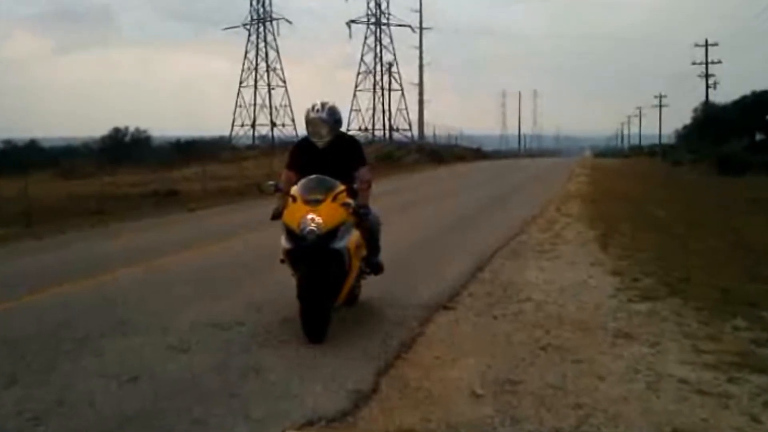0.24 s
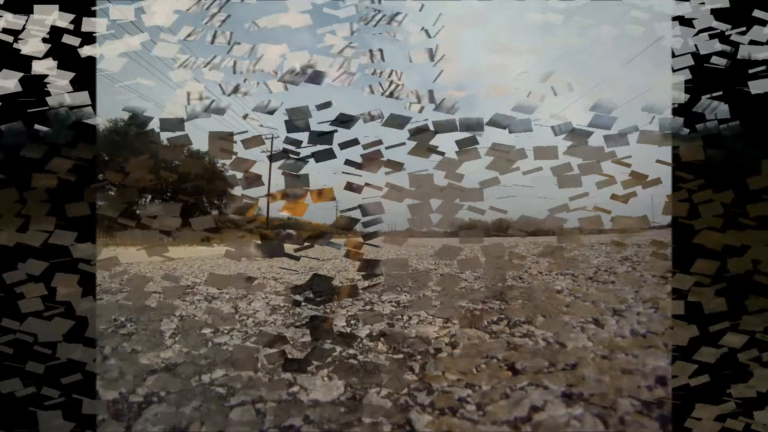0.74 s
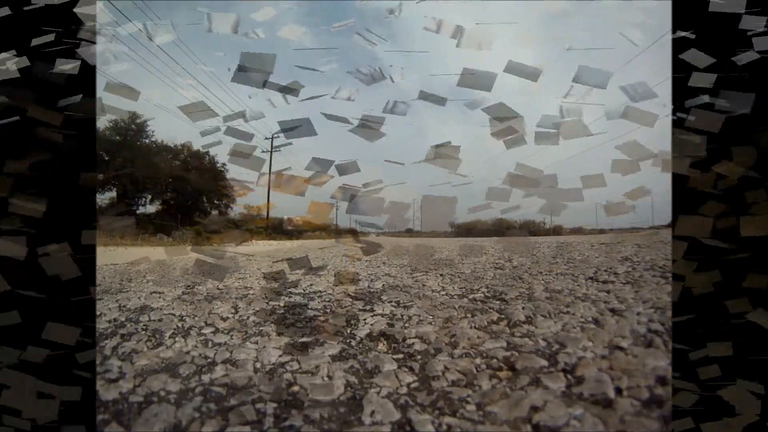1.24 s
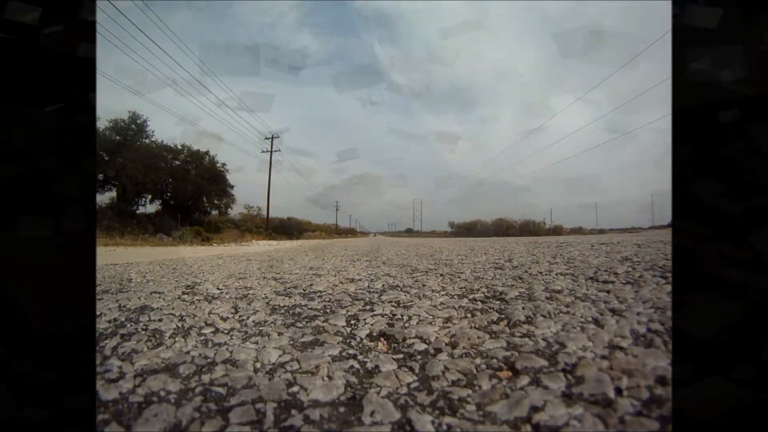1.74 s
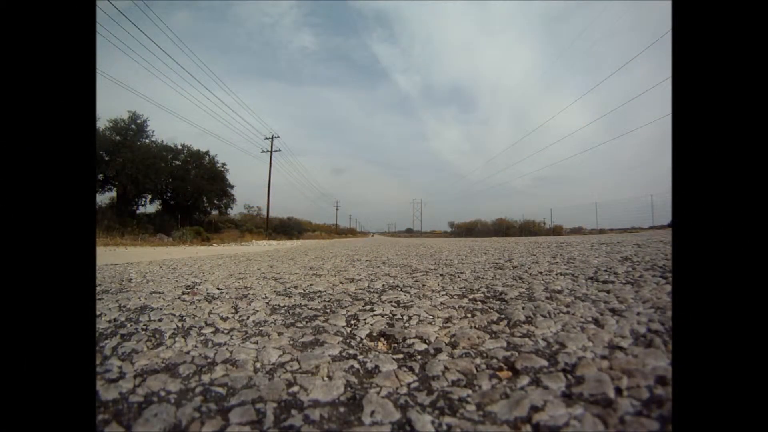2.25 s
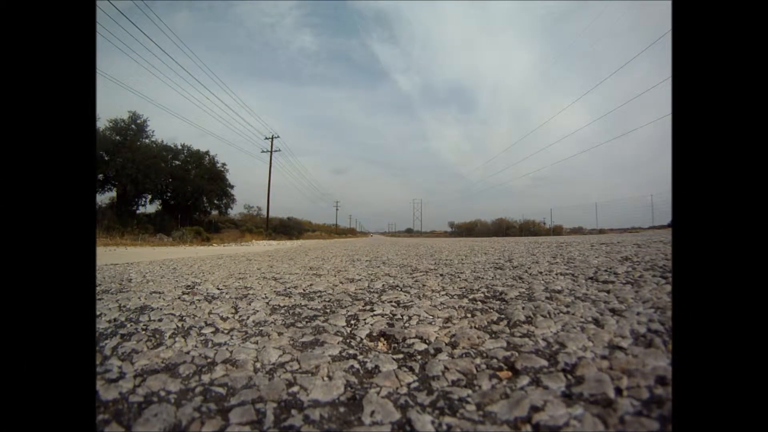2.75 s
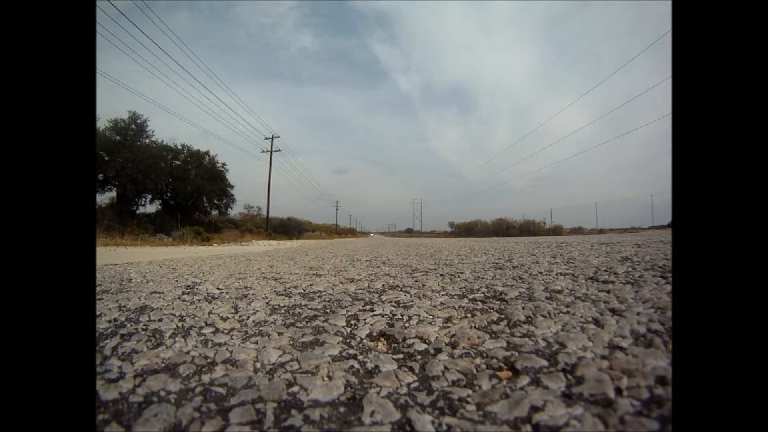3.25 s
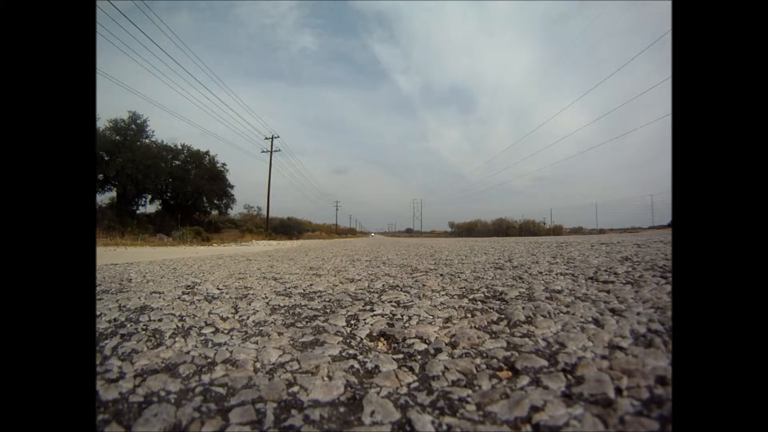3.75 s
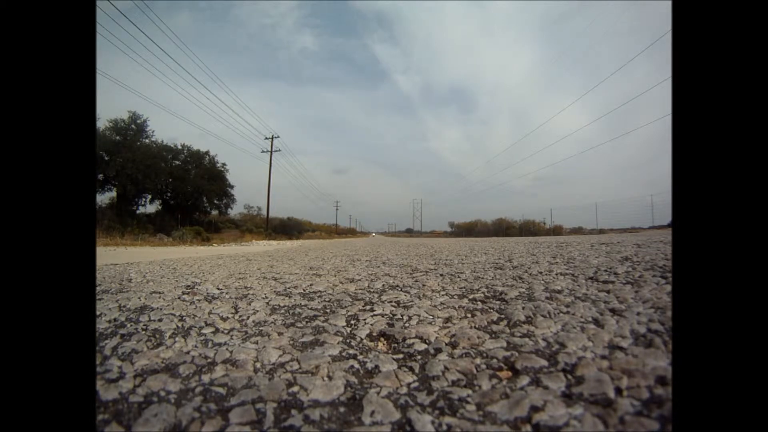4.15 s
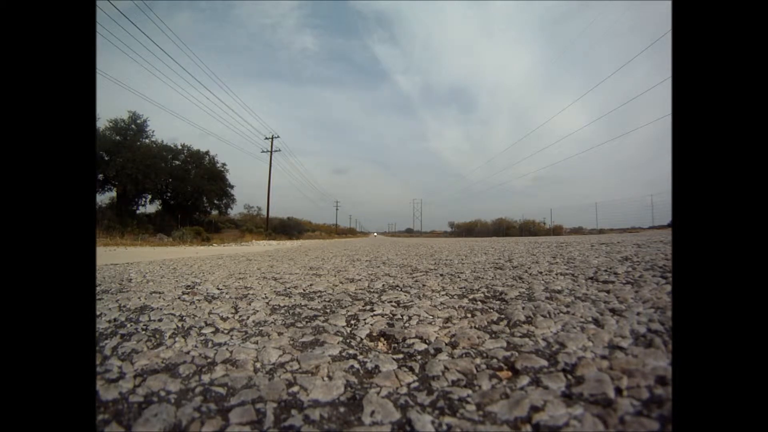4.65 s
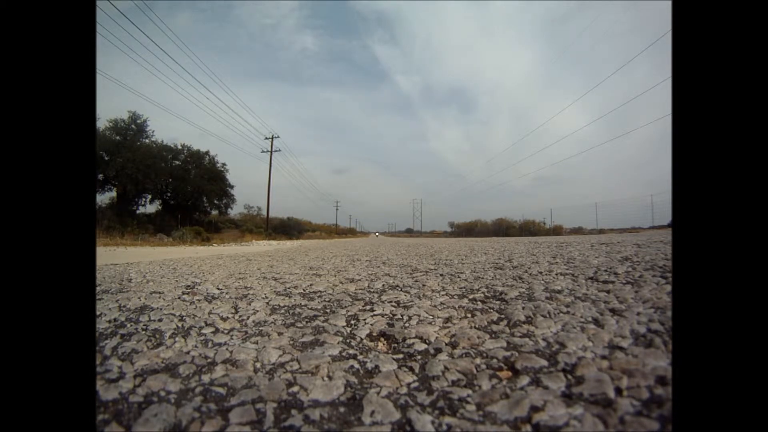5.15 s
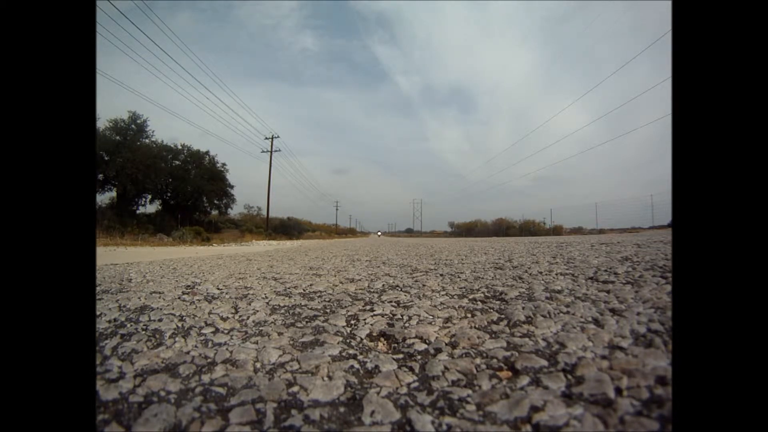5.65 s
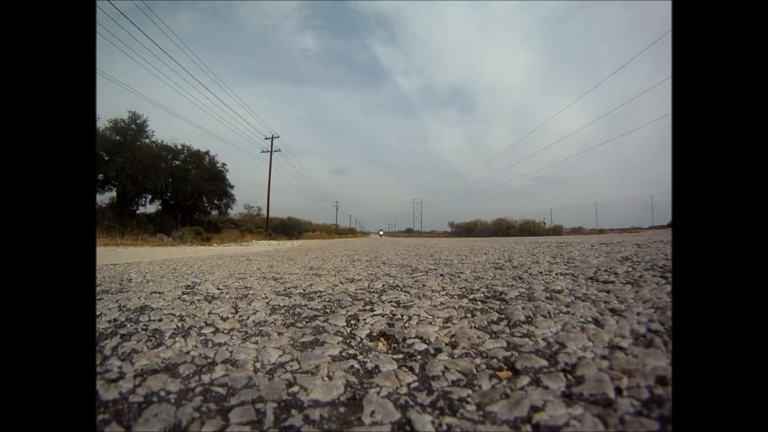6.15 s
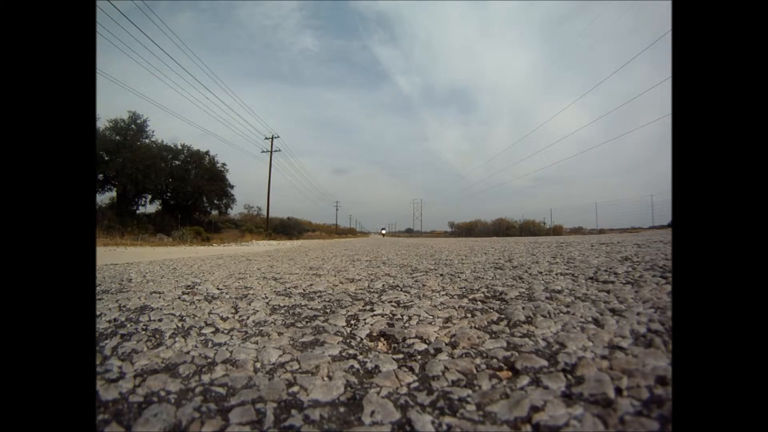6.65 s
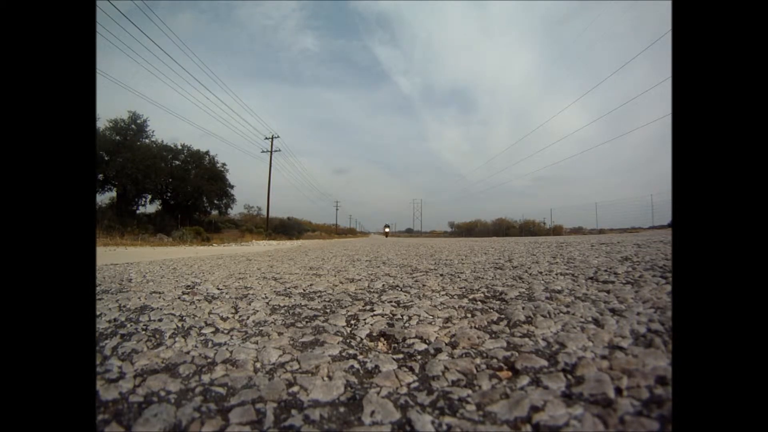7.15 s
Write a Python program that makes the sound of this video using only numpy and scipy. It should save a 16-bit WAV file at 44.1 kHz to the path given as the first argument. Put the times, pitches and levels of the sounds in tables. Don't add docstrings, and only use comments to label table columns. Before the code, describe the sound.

A motorcycle idles low and lumpy, pulls away on an open road, revs to a hard high drone, then stumbles through two quick late shifts.

```python
import sys
import numpy as np
from scipy import signal
from scipy.fft import rfft, irfft
from scipy.io import wavfile
from scipy.ndimage import uniform_filter1d

SR = 44100
rng = np.random.default_rng(int(sys.argv[2]) if len(sys.argv) > 2 else 0)


def put_to_file(sound):
    columns = np.atleast_2d(sound).T
    safe = np.clip(columns, -1, 1)
    whole_steps = np.round(safe * 32767)
    wavfile.write(sys.argv[1], SR, whole_steps.astype(np.int16))


def field_ratio(decibels):
    return 10 ** (np.asarray(decibels, dtype=float) / 20)


N = 326781
LONG = N + SR // 10

# (time [s], crank slip [cycles], change of exhaust level [dB])
STUMBLES = [
    (6.897, .45, -3),
    (6.907, 0, 2.5),
    (6.917, 0, -9),
    (7.016, .14, -3),
    (7.024, 0, 1),
    (7.032, -.12, -3),
    (7.303, -.2, -10),
]


def engine(t, hz, thump_db, drone_db, bark_db, gas_db, crank_db):
    # (frequency [Hz], level [dB])
    cold_silencer = [(5, -70), (35, -20), (50, -15), (72, -10.5), (108, -12), (143, 0), (165, -4),
                     (187, -7.5), (230, -19), (262, -27), (330, -40), (450, -64), (6000, -120)]
    # (frequency [Hz], level [dB])
    hot_silencer = [(20, -52.5), (60, -4), (110, -1), (150, 6), (205, 7.5), (255, -1.5), (320, -49),
                    (450, -54), (6000, -110)]
    # (frequency [Hz], level [dB])
    header = [(20, -59.5), (200, -25), (270, 1), (320, -3.5), (430, -3.5), (500, -2.5), (600, -37),
              (6000, -98.5)]
    # (frequency [Hz], level [dB])
    pipe = [(20, -75), (380, -32), (470, -2), (530, 3.5), (630, -4), (720, -10), (855, -20.5), (960, -32),
            (1100, -37.5), (1500, -47), (2500, -58), (6000, -94.5)]
    # (frequency [Hz], level [dB])
    manifold = [(20, -48.5), (100, -11.5), (300, 0.5), (420, -1), (530, 2.5), (620, -9.5), (710, -5),
                (820, -10), (1400, -44), (2000, -28), (6000, -62)]
    # (frequency [Hz], level [dB])
    jet = [(200, -37.5), (700, 1.5), (1000, -1.5), (1300, -0.5), (1600, -7), (2200, -4.5), (2600, -12.5),
           (2950, -0.5), (3300, -7), (3600, -16.5), (6000, -43.5)]
    # (start firing rate [Hz], end firing rate [Hz])
    warm_hz = (87.6, 140)

    pulses, alternate, phase = firings(t, hz)
    puffs = np.exp(-phase / .5) * noise() * np.sqrt(hz / SR)

    warm = np.clip((hz - warm_hz[0]) / (warm_hz[1] - warm_hz[0]), 0, 1)
    push = pulses + field_ratio(-17.5) * puffs
    cold_thump = colour(push, cold_silencer, ring=-0.076)
    hot_thump = colour(push, hot_silencer, ring=-0.11)
    thump = (1 - warm) * cold_thump + warm * hot_thump
    thump = thump + idle_ring(hz, thump)

    drone = roadside(colour(pulses + field_ratio(-2.0) * puffs, header, ring=0.4))
    bark = roadside(colour(pulses + field_ratio(-6.5) * puffs, pipe, ring=0.23))
    crank = roadside(colour(alternate, manifold))
    uneven_puffs = puffs * field_ratio(0.45 * walk(25))
    gas = roadside(colour(field_ratio(-13.5) * pulses + uneven_puffs, jet))

    exhaust = ride(thump, thump_db) + ride(drone, drone_db) + ride(bark, bark_db)
    exhaust = exhaust * misfires(t)
    mechanical = ride(crank, bark_db + crank_db) + ride(gas, gas_db)
    return exhaust + mechanical + howls(hz, pulses + field_ratio(5.0) * puffs)


def throttle(t):
    # (time [s], firing rate [Hz], loudness [dB], brightening of the nearing exhaust [dB])
    journey = [(.42, 32.93, -38, 0), (.9, 36, -35, 0.5), (1.82, 37.08, -33.5, -1.5), (2.35, 47, -30, 2),
               (2.701, 58.44, -30, 2.5), (2.8, 65.1, -22.5, -1), (3.38, 92.7, -19.5, 0.5),
               (3.63, 107.4, -15.5, -2.5), (4.12, 143.4, -16.5, -1), (4.68, 184.6, -13.5, -1),
               (4.95, 201.4, -13, 0.5), (5.17, 205.4, -12.5, -0.5), (5.4, 208.5, -12.5, .3),
               (6.0, 214.3, -12.5, 2), (6.35, 213.9, -14.5, 9.5), (6.9, 212.6, -12, 13),
               (7.082, 204.5, -12.5, 14), (7.41, 197.6, -12.5, 12.5)]
    # (peak time [s], rise [s], fall [s], rate jump [Hz], loudness jump [dB])
    blips = [
        (2.02, .19, .33, 16.5, -1.1),
        (6.991, .09, .085, -13.5, -0.25),
        (7.353, .06, .09, 56, 0.04),
    ]
    # (firing rate [Hz], thump [dB], drone [dB], bark [dB],
    # gas [dB], crank sound against bark [dB])
    voicing = [(36, 0.23, -62, -45, -46.5, -16), (52.9, 1.4, -31.5, -29.5, -41.5, -16),
               (69.5, -0.3, -22, -31.5, -49.5, -19), (96, 0.2, -17, -25, -49.5, -13.5),
               (123.3, -6.5, -18, -20, -48, -12.5), (139, 1.6, -13, -16.5, -46, -12.5),
               (176, -0.75, -20, -14.5, -44, -17.5), (197.6, 0.73, -28.5, -12.5, -46, -19.5),
               (212.4, -0.23, -19.5, -18.5, -44.5, -12.5), (215, 1.1, -13.5, -18.5, -44.5, -11.5)]
    closing = (0.33, 0.22, 1.054)
    # (drone [dB], bark [dB], gas [dB], crank sound [dB])
    shut_db = (-1.5, -14.5, -6.5, 14)
    # (time [s], level [dB])
    pops = [
        (6.903, 2),
        (7.022, 8),
        (7.297, 9),
    ]
    pop_s = 0.0098
    hunt_s, hunt_span_s, hunt_hz, hunt_share = 4.865, .17, 10.5, .014

    times, *columns = np.transpose(journey)
    hz, loud_db, near_db = (np.interp(t, times, c) for c in columns)
    for peak, rise, fall, jump_hz, jump_db in blips:
        slope = np.interp(t, [peak - rise, peak, peak + fall], [0, 1, 0])
        leap = np.sin(np.pi / 2 * slope) ** 1.3
        hz = hz + jump_hz * leap
        loud_db = loud_db + jump_db * leap

    rate, *columns = np.transpose(voicing)
    thump_db, *upper, crank_db = (np.interp(hz, rate, c) for c in columns)
    shut = gate(t, (6.92, 7.3), .02)
    pop_db = sum(db * np.exp(-((t - s) / pop_s) ** 2) for s, db in pops)
    drone_db, bark_db, gas_db = (loud_db + db + share * near_db + cut_db * shut
                                 for db, share, cut_db in zip(upper, closing, shut_db))

    hunt = np.exp(-((t - hunt_s) / hunt_span_s) ** 2) * np.sin(2 * np.pi * hunt_hz * (t - hunt_s))
    hz = hz * (1 + hunt_share * hunt)
    crank_db = crank_db + shut_db[-1] * shut
    return hz, loud_db + thump_db, drone_db + pop_db, bark_db + pop_db, gas_db, crank_db


def firings(t, hz):
    # (firing rate [Hz], speed wander [ratio], size scatter [dB])
    rough = [(38, .036, 1.8), (52, .013, .8), (90, .007, .4), (175, .007, .3), (193, .006, .3),
             (208, .004, .35), (214, .003, .4)]
    cylinders = [1, 0, -1, 0]

    rate, *columns = np.transpose(rough)
    wander, scatter_db = (np.interp(hz, rate, c) for c in columns)
    imbalance_db = .3 + 1.4 * gate(t, (6.25, 6.92), .1)

    turns = np.cumsum(hz * (1 + wander * 1.5 * walk(20))) / SR
    for s, slip, _ in STUMBLES:
        turns = turns + slip * np.clip((t - s) / .012 + .5, 0, 1)

    k = np.arange(1, int(turns[-1]))
    chance = rng.standard_normal((N // 100, 2))[k].T
    jitter = .003 + .35 * np.interp(k, turns, wander)
    at = np.interp(k + jitter * chance[0], turns, t)
    i, part = np.divmod(np.clip(at * SR, 0, LONG - 2), 1)
    i = i.astype(int)
    size_db = np.resize(cylinders, len(k)) * imbalance_db[i] + chance[1] * scatter_db[i]

    def pulse_train(size):
        return np.bincount(i, size * (1 - part), LONG) + np.bincount(i + 1, size * part, LONG)

    pulses = pulse_train(field_ratio(size_db))
    alternate = pulse_train(field_ratio(size_db) * (-1.) ** k)
    return pulses, alternate, turns % 1


def misfires(t):
    return field_ratio(sum(dip_db * np.exp(-((t - s) / .005) ** 2) for s, _, dip_db in STUMBLES))


def idle_ring(hz, thump):
    ring_hz, decay_s, ring_db = 162, 0.027, 2.3
    s = np.arange(SR // 5) / SR
    shell = np.exp(-s / decay_s) * np.cos(2 * np.pi * ring_hz * s)
    ring = signal.oaconvolve(thump, shell)[:LONG]
    return field_ratio(ring_db) * ring * 2 / (decay_s * SR) * np.interp(hz, (39.6, 58.3), [1, 0])


def howls(hz, drive):
    # (firing rate [Hz], rate span [Hz], resonance [Hz], width share [ratio], level [dB])
    singers = [
        (145, 34, 1010, 0.23, -56),
        (170, 9.9, 3000, .07, -61.5),
        (219.4, 2.3, 2400, .07, -60),
    ]
    out = 0
    for rate, span, ring_hz, share, db in singers:
        shape = [(ring_hz / 4, -70), (ring_hz * (1 - share), -14), (ring_hz, 0),
                 (ring_hz * (1 + share), -14), (ring_hz * 2, -60)]
        out = out + ride(colour(drive, shape), db) * np.exp(-((hz - rate) / span) ** 2)
    return out


def roadside(x):
    tail = rng.standard_normal(SR // 10) * np.exp(-np.arange(SR // 10) / (0.043 * SR))
    tail = tail / np.sqrt(np.sum(tail ** 2))
    return x + field_ratio(-11) * signal.oaconvolve(x, tail)[:LONG]


def thuds(t):
    # (time [s], level [dB])
    knocks = [
        (6.44, -33),
        (6.9, -20.5),
        (7.021, -25.5),
    ]
    knock_hz, knock_s = 124, 0.0099
    return sum(field_ratio(db) * np.exp(-((t - s) / knock_s) ** 2) * np.sin(2 * np.pi * knock_hz * (t - s))
               for s, db in knocks)


def wind(t):
    # (time [s], change of level [dB])
    gusts = [(.53, 8), (2.25, 5), (2.72, -7), (2.98, 6.5), (3.7, -5), (4.62, -6.5), (4.929, 14),
             (5.36, 9.5), (6.2, -4.5), (6.7, -5.5), (7.35, -8.5)]
    gusts_db = sum(db * np.exp(-((t - s) / .09) ** 2) for s, db in gusts)
    rumble = colour(noise(), [(10, -14.5), (25, 2.5), (45, -2.5), (90, -10.5), (300, -53)])
    return ride(rumble, -56.5 + gusts_db + 8.8 * walk(7))


def ticks():
    # (time [s], level [dB])
    snaps = [(4.732, -32), (5.095, -29), (5.271, -32), (5.466, -28), (5.489, -29), (6.906, -24),
             (6.976, -31)]
    crackle_s = (4.7, 6.0, 7.4)
    crackle_per_s = (50, 22)

    s, db = np.transpose(snaps)
    out = np.bincount((s * SR).astype(int), field_ratio(db), LONG)
    for start, end, per_s in zip(crackle_s, crackle_s[1:], crackle_per_s):
        when, size, sign = rng.random((int(per_s * (end - start)), 3)).T
        peak = field_ratio(-41 - 4.5 * np.log(size + .04)) * np.sign(sign - .5)
        at = start + when * (end - start)
        out = out + np.bincount((at * SR).astype(int), peak, LONG)
    return out


def air():
    # (frequency [Hz], level per Hz [dB])
    hush_tone = [(190, -33), (330, -5.5), (453, -1), (661, 0), (761, -12.5), (817, -10.5), (1450, -15),
                 (3860, -18), (5500, -21), (7150, -58), (12100, -120)]
    hush = colour(noise(), hush_tone)
    return hush * field_ratio(-61 + 1.7 * walk(13)) / hush.std()


def noise():
    return rng.standard_normal(LONG)


def colour(x, points, ring=1.):
    hz, db = np.transpose(points)
    size = 2 ** 13
    f = np.maximum(np.arange(size // 2 + 1) * SR / size, 1)
    c = irfft(np.log(field_ratio(np.interp(np.log(f), np.log(hz), db))))
    c[1:size // 2] *= 2
    c[size // 2 + 1:] = 0
    log_gain = rfft(c)
    response = irfft(np.exp(log_gain.real + 1j * ring * log_gain.imag))
    response = np.roll(response, size // 2)
    return signal.oaconvolve(x, response)[size // 2:][:LONG]


def ride(x, db):
    k = SR // 10
    power = uniform_filter1d(uniform_filter1d(x ** 2, k), k)
    return x * field_ratio(db) / np.sqrt(power + 1e-18)


def walk(rate):
    k = int(SR / rate)
    steps = np.repeat(rng.standard_normal(LONG // k + 1), k)
    return uniform_filter1d(uniform_filter1d(steps, k), k)[:LONG]


def gate(t, span, edge_s):
    return np.clip(np.minimum(t - span[0], span[1] - t) / edge_s + .5, 0, 1)


def scene():
    t = np.arange(LONG) / SR
    mix = engine(t, *throttle(t)) + wind(t) + air() + ticks() + thuds(t)
    return mix[None, :N]


def low_pass(x):
    return signal.sosfilt(signal.butter(12, 15470, fs=SR, output="sos"), x)


def record(dry):
    start_s = .3826
    soft = signal.sosfilt(signal.ellip(6, .5, 30, 5600, fs=SR, output="sos"), dry)
    held = np.repeat(signal.resample_poly(soft, 40, 147, axis=1), 4, axis=1)
    out = signal.resample_poly(held, 147, 160, axis=1)[:, :N]
    out = out * (np.arange(N) >= start_s * SR)
    since = np.maximum(np.arange(N) / SR - start_s, 0)
    out = out + field_ratio(-35) * (since > 0) * np.exp(-since / .0015)
    return low_pass(out)


dry = scene()
out = record(dry)
put_to_file(out)
```